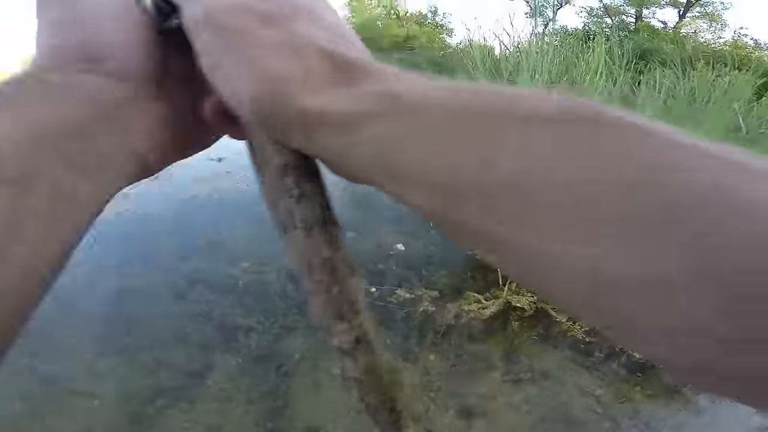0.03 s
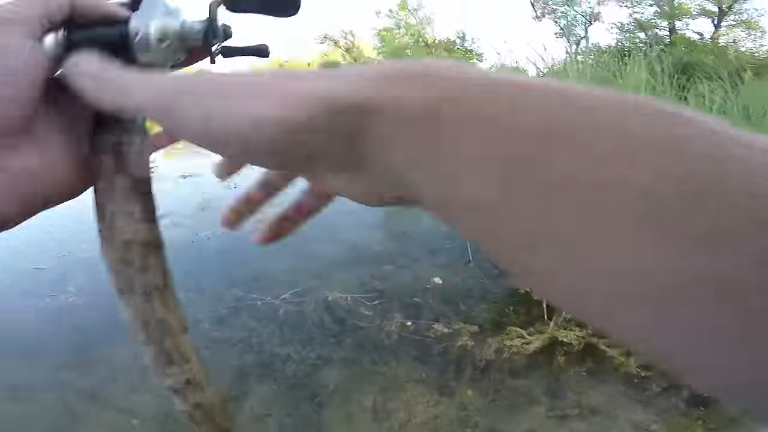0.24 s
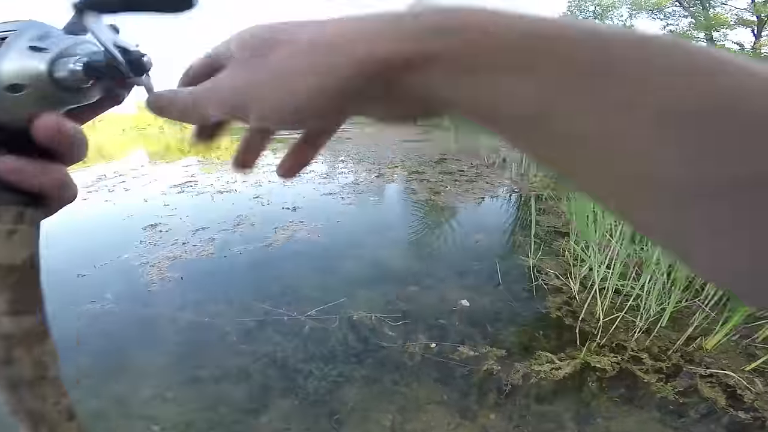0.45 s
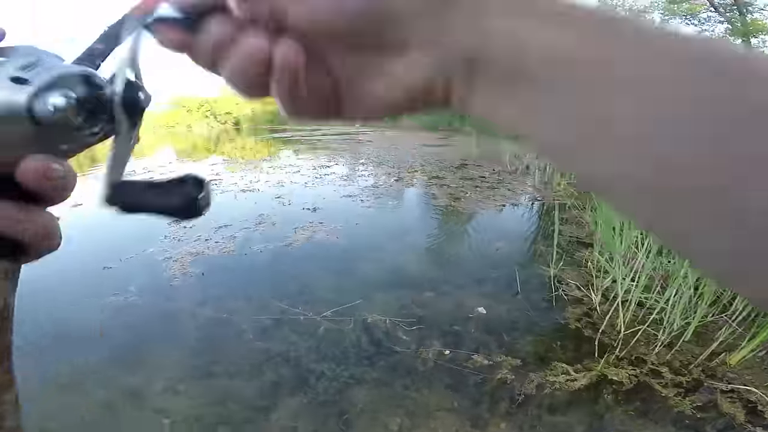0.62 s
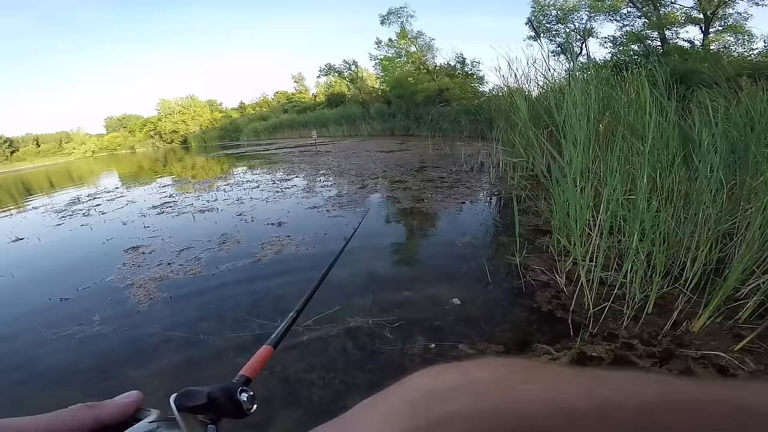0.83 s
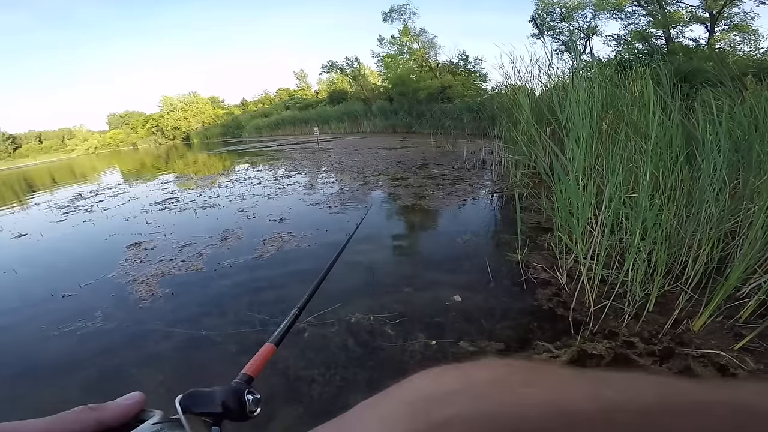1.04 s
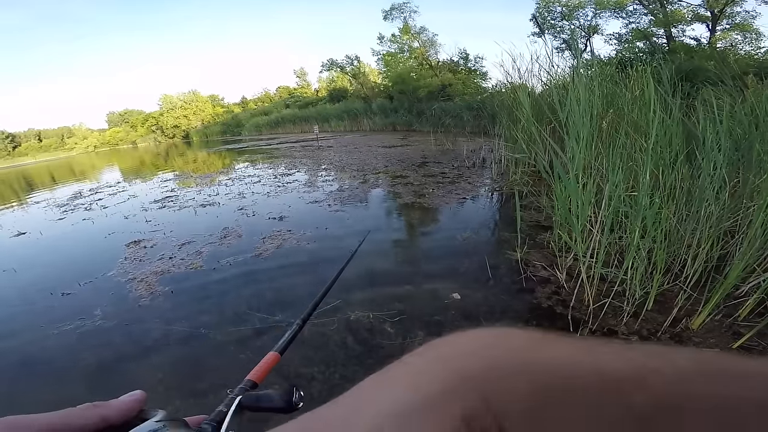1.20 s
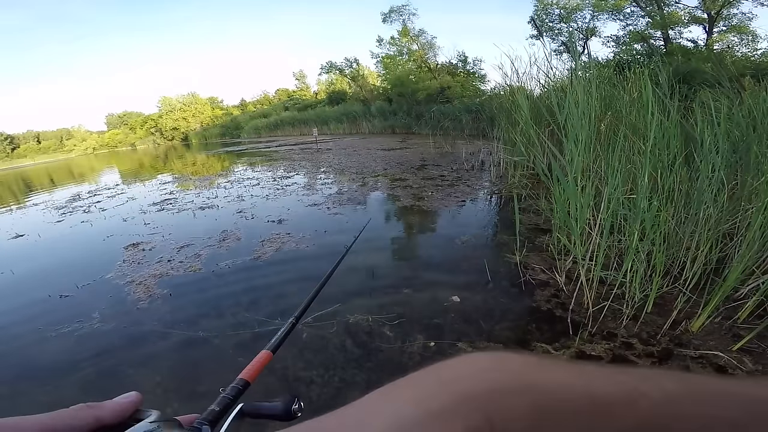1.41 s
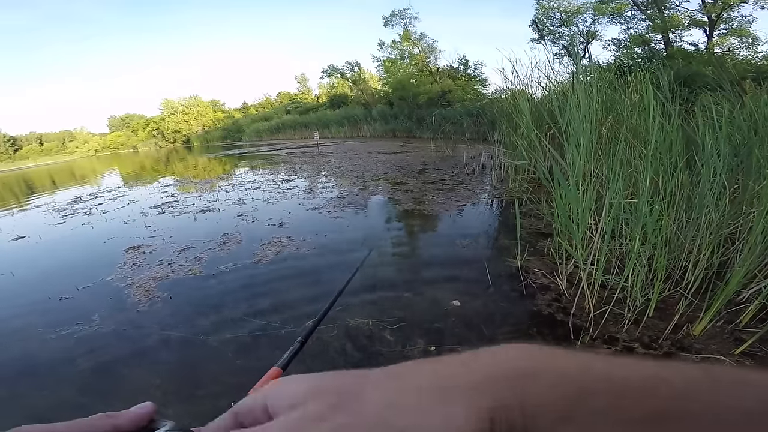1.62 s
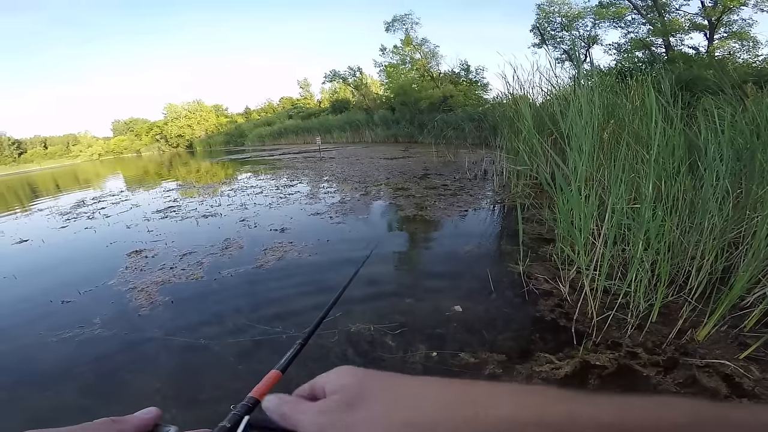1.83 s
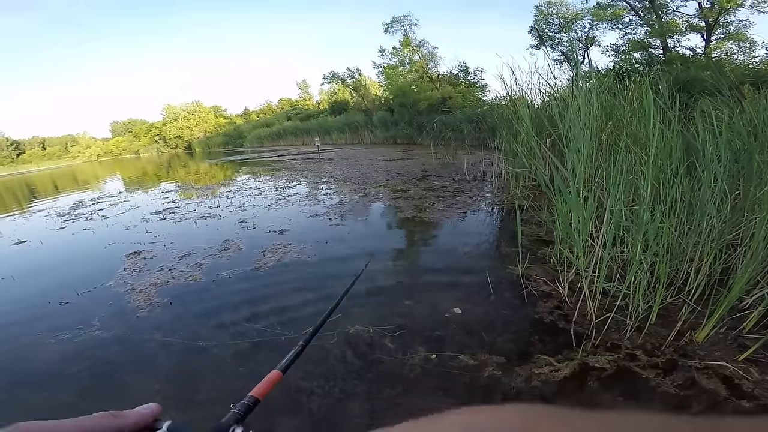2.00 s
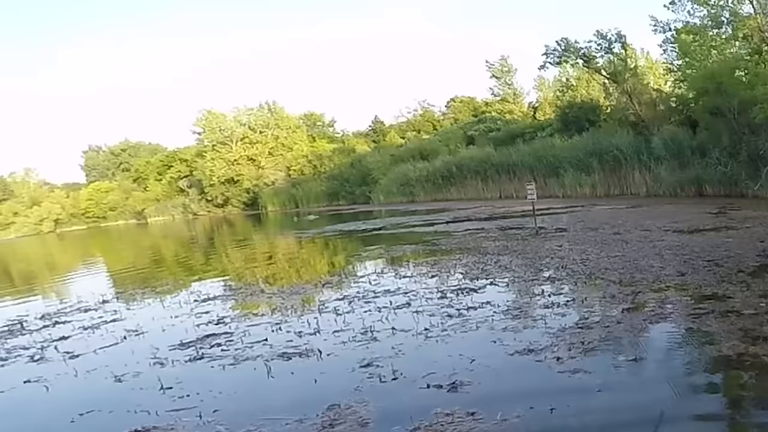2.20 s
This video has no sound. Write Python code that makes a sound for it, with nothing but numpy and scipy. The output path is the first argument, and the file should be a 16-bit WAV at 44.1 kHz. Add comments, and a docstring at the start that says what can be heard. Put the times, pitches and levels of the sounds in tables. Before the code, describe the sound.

After soft arm and hand rustling, a reel handle turns with a short scrape and hard metallic snap, followed by irregular clicks and light knocks, close and dry, over faint open air and high insect buzzing.

```python
"""Baitcasting reel at the pond

A baitcasting reel close to the microphone, at the edge of a pond. The handle is turned: grainy noise is
the gears scraping, and one sharp clack of noise bursts and damped modes is their snap into mesh, which
rings the rod. Then the reel ticks and rubs as line is wound in. Behind it are shaped noise for a low
rumble, soft open air and buzzing insects, one nearer insect's wavering tone and a faint thin whine."""
import sys
import numpy as np
from scipy.fft import rfft, irfft, next_fast_len
from scipy.io import wavfile
from scipy.ndimage import map_coordinates

SR = 44100
rng = np.random.default_rng(int(sys.argv[2]) if len(sys.argv) > 2 else 0)


def log_audio(samples):
    """Write samples as a 16-bit WAV file to the path given in sys.argv[1]."""
    # one column per channel
    frames = np.atleast_2d(samples).T
    # limit to full scale, then quantise
    limited = np.clip(frames, -1, 1)
    pcm = np.round(limited * 32767).astype(np.int16)
    wavfile.write(sys.argv[1], SR, pcm)


N = 99269  # length in samples


def amp(db):
    """Decibels to a linear factor."""
    return 10 ** (np.asarray(db) / 20)


def unit(x):
    """Scale to an rms of 1."""
    return x / np.sqrt(np.mean(x ** 2) + 1e-20)


def clock():
    """Time of every sample in seconds."""
    return np.arange(N) / SR


def curves(rows):
    """One value per sample for each column after the time."""
    s, *columns = np.transpose(rows)
    return [np.interp(clock(), s, column) for column in columns]


def wobble(rate):
    """A smooth random curve, rate knots a second."""
    knots = rng.standard_normal(N // 4)
    return map_coordinates(knots, [clock() * rate], mode="wrap")


def noise(colour, tilt_db=0):
    """Noise of rms 1 with a (hz, db) colour, tilted in dB per octave about 1 kHz."""
    hz = np.fft.rfftfreq(N, 1 / SR) + 1  # 1 Hz up, so the logarithm exists at zero
    colour_hz, colour_db = np.transpose(colour)
    shape_db = np.interp(np.log(hz), np.log(colour_hz), colour_db)
    octaves = np.log2(np.maximum(hz, 500) / 1000)  # no further tilt below 500 Hz
    random_phase = np.exp(2j * np.pi * rng.random(len(hz)))
    return unit(irfft(amp(shape_db + tilt_db * octaves) * random_phase, N))


def placed(s, shape):
    """A sound of a third of a second, given as a function of its own time, that starts at s."""
    first, size = int(np.ceil(s * SR)), SR // 3
    out = np.zeros(N + SR)
    out[first:first + size] = shape((first + np.arange(size)) / SR - s)
    return out[:N]


def fall(t, t60, hold, attack):
    """Envelope of a contact: quick rise, hold, exponential fall of 60 dB in t60 seconds."""
    rise = 1 - np.exp(-t / attack)
    return rise * np.exp(-np.log(1000) * np.maximum(t - hold, 0) / t60)


def blow(s, t60, hold=0., attack=0.00025):
    """The envelope of one contact at s."""
    return placed(s, lambda t: fall(t, t60, hold, attack))


def ring(s, hz, t60, attack):
    """One damped mode, a sine that dies away from s."""
    return placed(s, lambda t: fall(t, t60, 0, attack) * np.sin(2 * np.pi * hz * t))


def swell(s, width):
    """A bell-shaped rise and fall, down to 1/e at width seconds either side of s."""
    return np.exp(-((clock() - s) / width) ** 2)


def friction(levels, colour, grain_db, grain_rate):
    """Rubbing surfaces: coloured noise with a random grain, following a (start_s, level_db) curve."""
    level_db, = curves(levels)
    moving = (clock() > levels[0][0]) & (clock() < levels[-1][0])
    grain = amp(grain_db * wobble(grain_rate))
    return moving * amp(level_db) * unit(noise(colour) * grain)


def outdoors():
    """Open air over a low uneven rumble, with far insects: three noises, each of its own colour."""
    # open air: hz, db
    air_colour = [(100, -24.5), (200, 12), (350, 10), (600, 9.5), (900, 9.5), (1120, 6.5), (1400, 0.5),
                  (2500, 1), (3700, -1), (4700, -2.5), (5700, -2.5), (6500, -5), (9000, -10.5),
                  (10500, -13.5), (15000, -15.5)]
    # low rumble: hz, db
    rumble_colour = [(10, -15), (25, -1), (42, 3.5), (58, 2.5), (75, 1), (97, -8), (120, -2), (160, -12),
                     (220, -16), (320, -23), (600, -53.5), (2000, -79)]
    # level of the rumble: start_s, level_db
    rumble_levels = [(0, -45), (.06, -41), (.29, -43), (.345, -38.5), (.385, -45), (.52, -39.5),
                     (.6, -45.5), (.64, -39.5), (.705, -46.5), (.77, -40.5), (.9, -42), (1.03, -47),
                     (1.11, -41), (1.25, -44), (1.31, -38.5), (1.37, -44.5), (1.47, -41.5), (1.86, -45),
                     (2.0, -42.5), (2.25, -42)]
    # insects farther off in the reeds: hz, db
    far_insect_colour = [(3000, -42), (3850, -11), (4150, -1), (4500, -11), (5100, -14), (5700, -6.5),
                         (6200, -25), (8000, -55)]
    air = amp(-56.5 + wobble(8.1)) * noise(air_colour)  # dB, wobbling by about 1 dB
    rumble_db, = curves(rumble_levels)
    rumble = amp(rumble_db - 0.3 * wobble(10)) * noise(rumble_colour)
    # the far insects fade in as the microphone turns to the reeds
    turn_start_s, turn_length_s, far_insects_db = 0.94, 0.16, -68.5
    facing = np.clip((clock() - turn_start_s) / turn_length_s, 0, 1)
    return air + rumble + facing * amp(far_insects_db) * noise(far_insect_colour)


def insects():
    """A blurred chorus of noise and one nearer insect whose pitch and level follow each wing stroke."""
    # chorus in the reeds: hz, db
    chorus_colour = [(3000, -47.5), (6400, -22), (7000, -4.5), (7700, 0), (8500, 1), (9000, -2.5),
                     (9400, -21.5), (10500, -40)]
    # nearest insect: start_s, level_db, carrier_hz
    singer_curve = [(0, -66, 8750), (.18, -62, 8800), (.32, -62.5, 8820), (.45, -68.5, 8740),
                    (.8, -66, 8750), (1.1, -72, 8520), (2.25, -73, 8450)]
    wing_rate_hz, wing_sweep_hz, pitch_blur_hz, chorus_db = 40.2, 260, 130, -62.5
    level_db, carrier_hz = curves(singer_curve)
    wing_hz = wing_rate_hz * (1 + .04 * wobble(12))
    stroke = np.sin(2 * np.pi * np.cumsum(wing_hz) / SR)
    pitch_hz = carrier_hz + wing_sweep_hz * stroke + pitch_blur_hz * wobble(820)
    tone = np.sin(2 * np.pi * np.cumsum(pitch_hz) / SR)
    flutter = amp(2.6 * stroke + 2 * wobble(200))
    singer = amp(level_db) * unit(flutter * tone)
    chorus = amp(chorus_db + 0.68 * wobble(70)) * noise(chorus_colour)
    return singer + chorus


def handling():
    """Arms and hands: damped modes for taps, soft noise for brushing and arms, a low sine for a jolt."""
    # hush of the moving arms: start_s, level_db
    arm_levels = [(0, -61), (.07, -55.5), (.13, -61), (.22, -51.5), (.33, -54), (.45, -58.5), (.62, -55.5),
                  (.9, -62), (1.05, -69.5), (1.2, -93)]
    # colour of the arms: hz, db
    arm_colour = [(60, -13.5), (130, 2), (190, 1.5), (300, -5.5), (480, -9.5), (700, -18.5), (3000, -28.5),
                  (15000, -37)]
    # soft hiss of the hands on the grip: centre_s, level_db, half_width_s
    brushes = [(0.032, -60, 0.016), (.16, -61, 0.018), (0.206, -62, 0.015), (0.267, -72, .014)]
    # colour of that hiss: hz, db
    brush_colour = [(500, -8), (9000, -3), (12500, -2), (14700, 1), (16000, -6)]
    # soft knocks of hand and handle on the rod: start_s, level_db, pitch_hz, t60_s
    tap_rows = [(.677, -34, 1310, 0.015), (.730, -40, 520, 0.063), (.7785, -45, 2000, .06),
                (.795, -34.5, 820, 0.033), (.868, -42, 477, .04), (.9335, -46, 2350, .016),
                (1.1055, -42.5, 1397, 0.013), (1.347, -43, 760, 0.021), (1.568, -45, 950, .018),
                (1.606, -41, 930, 0.021), (1.670, -44, 1020, .018), (1.6705, -46, 620, .02)]
    arms = friction(arm_levels, arm_colour, grain_db=2.5, grain_rate=38.7)
    brush = sum(amp(db) * swell(s, width) for s, db, width in brushes) * noise(brush_colour)
    # a low soft jolt just after the clack
    jolt_s, jolt_width_s, jolt_db, jolt_hz = 0.6, 0.027, -39, 34
    sway = np.sin(2 * np.pi * jolt_hz * (clock() - jolt_s))
    jolt = amp(jolt_db) * swell(jolt_s, jolt_width_s) * sway
    taps = sum(amp(db) * ring(s, hz, t60, attack=.0006) for s, db, hz, t60 in tap_rows)
    rough_taps = taps * (1 + 0.42 * wobble(700))
    return arms + brush + jolt + rough_taps


def ticks():
    """Each tick has a woody body, a shorter metallic ping and one mode that rings on."""
    # ticks of reel and line: start_s, body_db, ping_db, body_t60_s, mode_hz, mode_db
    tick_rows = [(0.153, -49, -55, .009, 7600, -51), (.169, -55, -52, .012, 3900, -52),
                 (.362, -63, -58, .01, 8000, -54), (.4874, -38.5, -63, .014, 2900, -40),
                 (0.4927, -32.5, -42, 0.015, 5200, -36), (.578, -44.5, -52, 0.018, 2350, -44),
                 (.656, -48, -51, .008, 5400, -54), (0.6773, -31, -25, 0.0094, 3000, -29),
                 (.6825, -47, -53, .01, 6000, -46), (0.719, -44, -49, .01, 3900, -52),
                 (0.729, -34, -54, 0.014, 3600, -30), (0.7375, -32, -37.5, 0.0087, 5540, -38),
                 (0.7413, -37.5, -48, 0.02, 2040, -37), (0.7688, -44, -61, 0.014, 5200, -45),
                 (0.7952, -35.5, -43.5, 0.014, 4620, -33), (0.83, -50, -58, .02, 3660, -49),
                 (.8387, -34, -22.5, 0.0066, 5000, -33), (0.8442, -50, -54, .008, 2250, -48),
                 (0.8676, -40, -51, 0.011, 2210, -44), (0.889, -48, -52, 0.011, 5400, -54),
                 (.893, -42, -52, .016, 1970, -46.5), (1.1044, -50, -64, 0.011, 2200, -37),
                 (2.119, -72, -57, 0.0084, 14300, -63), (2.237, -68, -58, .008, 10800, -60)]
    # colour of the bodies: hz, db
    body_colour = [(100, -14), (450, -3.5), (850, 2), (1300, -1), (1700, -9), (2200, 0.5), (2800, 0),
                   (3900, -3), (5300, -1), (6000, -2.5), (6700, -12.5), (7800, -2.5), (9500, -18),
                   (16000, -27.5)]
    # colour of the pings: hz, db
    ping_colour = [(1000, -25), (7000, -22.5), (8900, 5), (9700, -11), (10200, 0), (10800, -7), (11800, 0),
                   (13200, -3), (14500, -12.5), (16000, -24)]
    body, ping, modes = 0, 0, 0
    for s, body_db, ping_db, t60, hz, mode_db in tick_rows:
        body = body + amp(body_db) * blow(s, t60, hold=0.000808)
        ping = ping + amp(ping_db) * blow(s, 0.65 * t60, hold=.0008)
        modes = modes + amp(mode_db) * ring(s, hz, 1.3 * t60, attack=.0003)
    return body * noise(body_colour) + ping * noise(ping_colour) + modes


def winding():
    """Teeth scrape as they mesh and the gear train rubs on: two grainy friction noises."""
    # gear teeth scraping around the clack: start_s, level_db
    scrape_levels = [(.484, -70.5), (.497, -46.5), (.5025, -49), (.505, -32), (.513, -29), (.524, -21.5),
                     (.532, -27.5), (.543, -27), (.549, -46), (.565, -60.5), (.6, -81)]
    # colour of the scrape: hz, db
    scrape_colour = [(100, -18.5), (450, -2.5), (900, -3), (1400, -9.5), (2300, -0.5), (3800, -5),
                     (5200, 1.5), (6300, -8), (7100, -5), (8500, -9), (13000, -15), (16000, -17)]
    # rubbing of the turning reel: start_s, level_db
    rub_levels = [(.48, -67), (.55, -47), (.585, -50.5), (.612, -54), (.655, -51.5), (.685, -53.5),
                  (.711, -55.5), (.735, -43), (.756, -51.5), (.79, -49.5), (.805, -51.5), (.822, -60),
                  (.845, -44), (.859, -61), (.872, -49), (.9, -64), (.93, -78)]
    # colour of the rubbing: hz, db
    rub_colour = [(100, -11.5), (450, 7), (850, 3.5), (1700, -4), (2100, 1), (2800, -2), (3550, 0),
                  (4100, -5), (5200, -4), (6500, -10), (9000, -15.5), (14000, -13.5), (16000, -21)]
    scrape = friction(scrape_levels, scrape_colour, grain_db=3, grain_rate=900)
    rub = friction(rub_levels, rub_colour, grain_db=2, grain_rate=450)
    return scrape + rub


def strike(s, tilt_db, t60):
    """Steel on steel: a hard crack of noise and the short ring of the reel's parts."""
    # colour of the crack before its tilt: hz, db
    crack_colour = [(100, -36), (400, -24), (760, -7.5), (1080, -4), (1500, -12.5), (2200, -2.5),
                    (3000, -2.5), (3800, -13), (5000, 1), (5700, 0), (6350, -8.5), (7300, 1.5), (7900, 0),
                    (9400, -4), (10150, 2), (10750, -8.5), (11400, 4.5), (13200, 0), (14700, -3.5),
                    (16000, -18)]
    # short modes of the reel's metal parts before tilt, relative to the metal level: pitch_hz, db, t60_s
    metal_modes = [(2170, -13.5, .016), (2770, -18, .012), (4980, -14, .02), (5480, -16.5, .014),
                   (7380, -14, .014), (8280, -13.5, 0.01), (9230, -12, .012), (10110, -12, .015),
                   (11650, -14, .011), (12500, -11, .01), (13200, -11, .014), (14530, -14, .01)]
    metal_db, pivot_hz = -2, 11000  # the tilt leaves a mode at the pivot unchanged
    crack = blow(s, t60, hold=.0007) * noise(crack_colour, tilt_db)
    metal = 0
    for k, (hz, db, life) in enumerate(metal_modes):
        level = amp(db + tilt_db * np.log2(hz / pivot_hz))
        metal = metal + (-1) ** k * level * ring(s, hz, life, attack=0.00033)  # alternating sign
    return crack + amp(metal_db) * metal


def clack():
    """The gears snap in with a burst of strikes that thud through the grip and ring the rod."""
    # strikes of the gears: start_s, level_db, tilt_db_per_octave, crack_t60_s
    strike_rows = [(0.5057, -25.5, 0, 0.014), (0.5102, -18.5, -1.5, 0.0095), (.5158, -10, 0, 0.0087),
                   (0.5189, -2, 1, 0.0056), (0.5194, -8, -2.5, .01), (0.5238, -1.5, 3.5, 0.0044),
                   (0.5294, -26, 0, 0.014)]
    # ringing of rod and reel frame, levels before about 1 dB of random spread: pitch_hz, level_db, t60_s
    rod_modes = [(382.5, -33, .19), (470.5, -33, 0.11), (549, -29, 0.028), (761, -15.5, .032),
                 (910, -33.5, .19), (1018, -18.5, 0.036), (1087, -41.5, .26), (2035, -42.5, .17),
                 (2250, -32, .04), (3645, -42.5, 0.072), (4634, -36, .06), (4980, -24.5, 0.044),
                 (5200, -29.5, .075), (5520, -30, .06), (7100, -34, .05)]
    rod_start_s = .5195
    strikes = sum(amp(db) * strike(s, tilt, t60) for s, db, tilt, t60 in strike_rows)
    rod = 0
    for hz, db, t60 in rod_modes:
        rod = rod + amp(db + rng.normal()) * ring(rod_start_s, hz, t60, attack=0.00099)
    fluttering_rod = rod * (1 + 0.14 * wobble(200))
    thud = amp(-15.5) * ring(.5255, hz=548, t60=.012, attack=.0006)
    return strikes + fluttering_rod + thud


def whine():
    """A faint thin whine: one sine that glides up and down, then falls away."""
    # path of the whine: start_s, pitch_hz, level_db
    whine_curve = [(1.68, 12000, -92), (1.76, 11900, -84), (1.825, 14120, -83), (1.88, 13200, -81),
                   (1.97, 13940, -79), (2.04, 13100, -79), (2.1, 11030, -79.5), (2.13, 10480, -100)]
    glide_hz, level_db = curves(whine_curve)
    pitch_hz = glide_hz + 50 * wobble(400)
    tone = unit(np.sin(2 * np.pi * np.cumsum(pitch_hz) / SR))
    return (clock() > whine_curve[0][0]) * amp(level_db) * tone


def scene():
    """Everything at the pond, added up on one channel."""
    return (outdoors() + insects() + handling() + ticks() + winding() + clack() + whine())[None]


def record(dry):
    """The microphone rounds off the loudest peaks, then a steep filter takes away the top."""
    peak_limit, band_limit_hz = 0.97, 15250
    held = dry / (1 + np.abs(dry / peak_limit) ** 6) ** (1 / 6)
    size = next_fast_len(N + SR // 4)  # padded so the filter does not wrap round
    hz = np.fft.rfftfreq(size, 1 / SR)
    lowpass = 1 / np.sqrt(1 + (hz / band_limit_hz) ** 240)
    return irfft(rfft(held, size) * lowpass, size)[:, :N]


dry = scene()
out = record(dry)
log_audio(out)
```